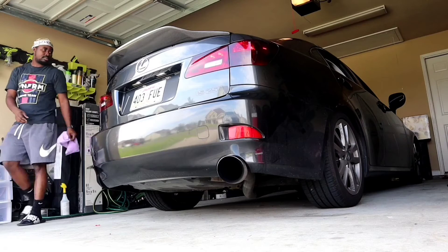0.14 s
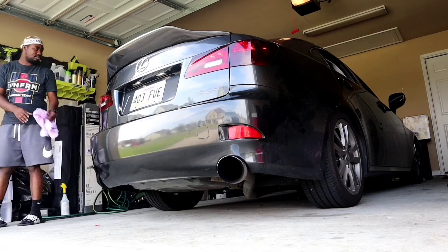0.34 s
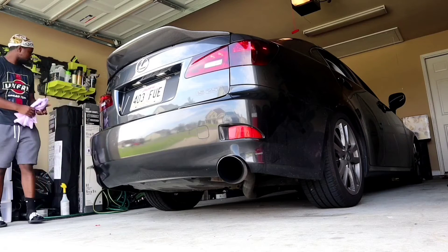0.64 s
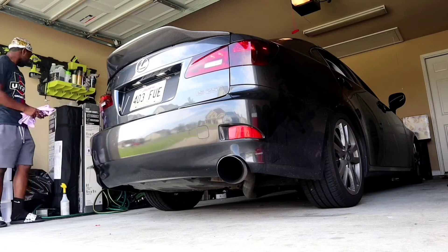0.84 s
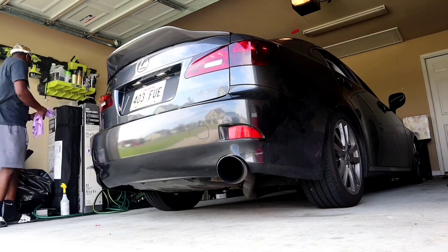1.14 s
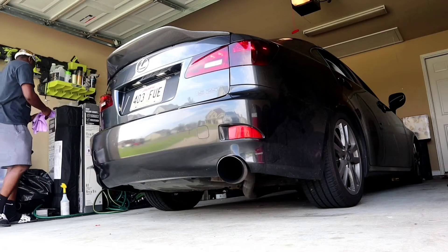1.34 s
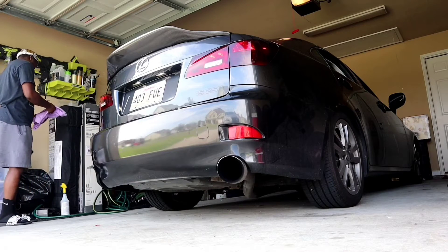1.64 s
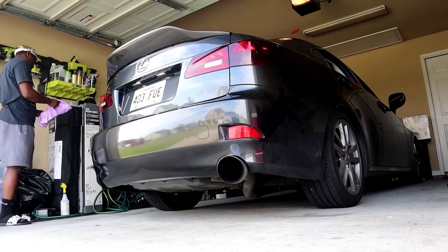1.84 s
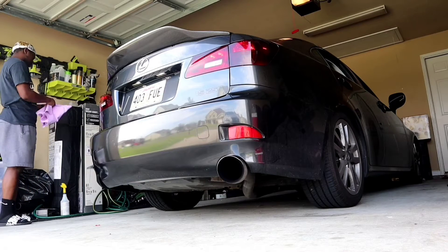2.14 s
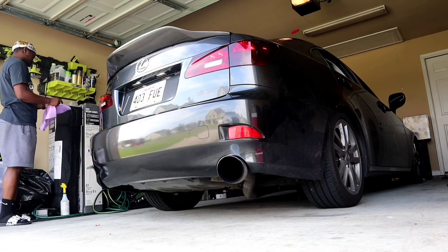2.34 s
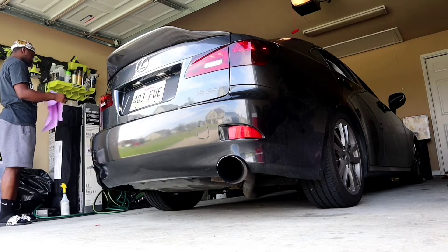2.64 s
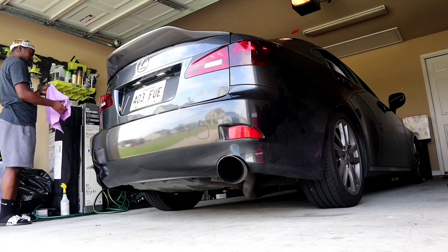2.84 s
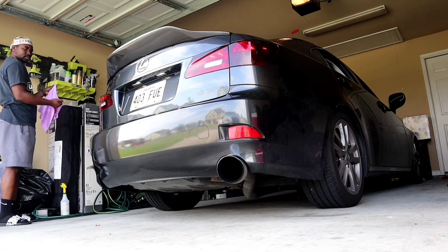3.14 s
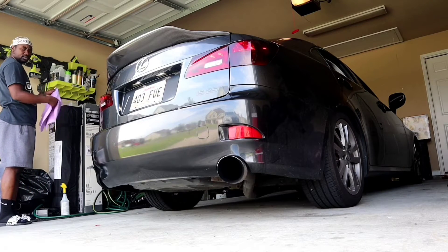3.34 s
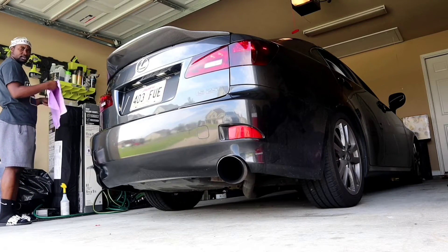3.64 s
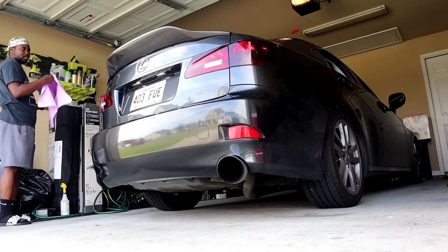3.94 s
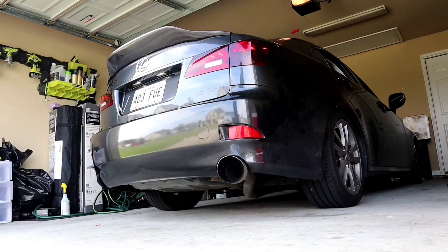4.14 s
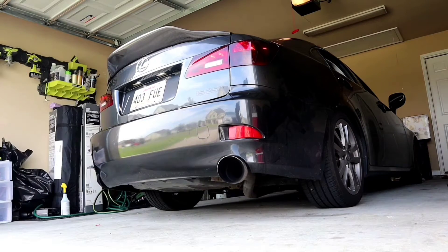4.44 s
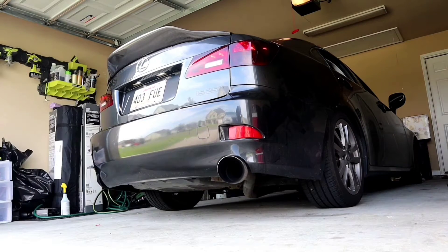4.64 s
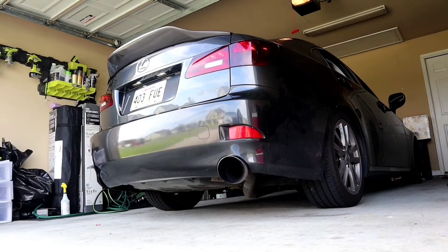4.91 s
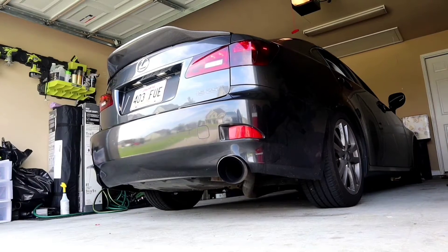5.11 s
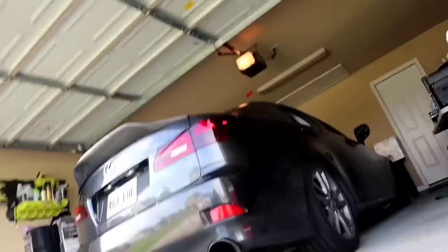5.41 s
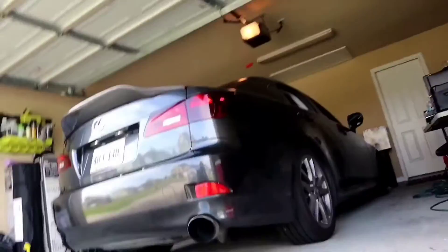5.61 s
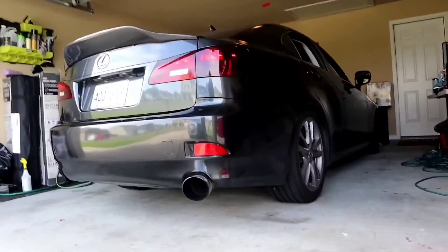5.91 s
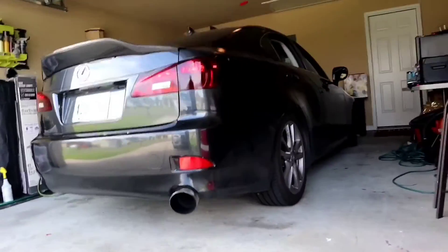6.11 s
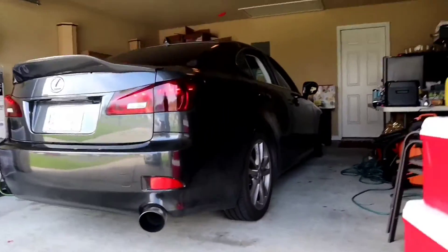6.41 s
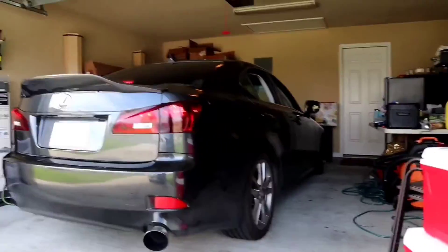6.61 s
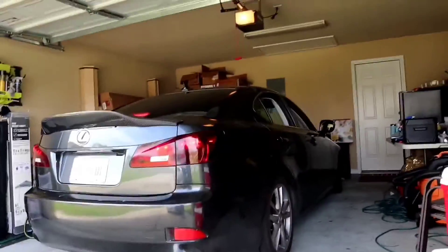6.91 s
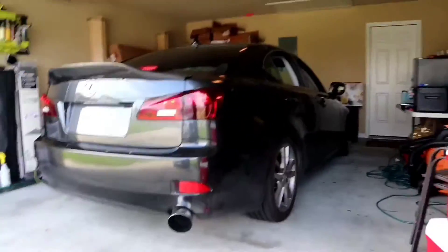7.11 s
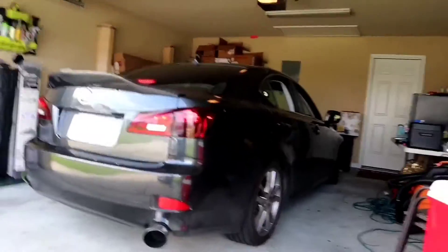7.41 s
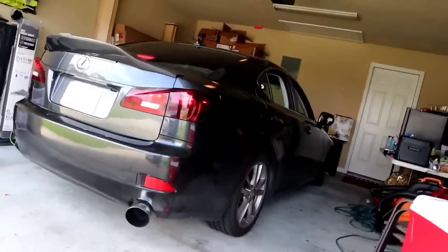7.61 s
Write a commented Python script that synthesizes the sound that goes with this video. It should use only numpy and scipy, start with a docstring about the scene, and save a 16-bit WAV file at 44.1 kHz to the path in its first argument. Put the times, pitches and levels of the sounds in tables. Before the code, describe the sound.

A six-cylinder car idles in a garage, heard close behind its open tailpipe. The low drone is lumpy and uneven, with quick booming surges, raspy gas and throbbing hiss over a faint belt whine. After about four seconds it cuts to a very short silence, then returns slightly slower and rounder with a few hard burbles, the sound turning a little hollow as the microphone is lifted off the floor.

```python
"""A six-cylinder car idles through an open exhaust in a garage, heard from just behind the tailpipe.
Even firings sum to a harmonic drone; uneven burns, and surges of hard ones, make pipe and garage boom.
Turbulent gas rasps and hisses, and the belt drive whines in proportion to engine speed.
The idle is lumpy at first; after a short silence it resumes a little slower and rounder, with a few hard
burbles, and the microphone is lifted off the floor, so that a floor reflection hollows the sound."""
import sys
import numpy as np
from scipy import signal
from scipy.fft import rfft, irfft
from scipy.io import wavfile
from scipy.ndimage import uniform_filter1d, minimum_filter1d

SR = 44100
rng = np.random.default_rng(int(sys.argv[2]) if len(sys.argv) > 2 else 0)


def store_pcm(level_fs):
    """Save levels as 16-bit WAV."""
    pcm = np.round(np.clip(level_fs, -1, 1) * 32767).astype(np.int16)
    wavfile.write(sys.argv[1], SR, np.atleast_2d(pcm).T)


N = 342216
TIME = np.arange(N) / SR  # s
FILTER_HZ = np.fft.rfftfreq(32768, 1 / SR)  # frequency grid of the resonant bodies


def gain_of(db):
    """Level law: decibels to amplitude."""
    return 10 ** (np.asarray(db) / 20)


def evened(x):
    """Power normalisation: scales to rms 1."""
    return x / np.sqrt(np.mean(x ** 2) + 1e-20)


def curve(rows, axis=1):
    """Linear interpolation: one column of a table of times, at every sample."""
    rows = np.array(rows)
    return np.interp(TIME, rows[:, 0], rows[:, axis])


def hump(peak_s, half_s):
    """Gaussian envelope: a bell of height 1 around its peak."""
    return np.exp(-np.minimum(((TIME - peak_s) / half_s) ** 2, 20))


def coloured_noise(points):
    """Spectral shaping: white noise given a spectrum, at rms 1."""
    hz, db = np.transpose(points)
    noise_hz = np.fft.rfftfreq(N, 1 / SR)
    colour_db = np.interp(np.log(noise_hz + 1), np.log(hz), db, left=-100, right=-100)
    spectrum = rfft(rng.standard_normal(N)) * gain_of(colour_db)
    return evened(irfft(spectrum, N))


def causal(magnitude):
    """Minimum phase: the complex response of a body that rings only after it is struck."""
    log_gain = np.log(np.maximum(magnitude / magnitude.max(), 1e-5))
    circle = np.concatenate([log_gain, log_gain[-2:0:-1]])
    # the Hilbert transform of the log magnitude gives the phase
    return np.exp(np.conj(signal.hilbert(circle)))[:len(magnitude)]


def ring(x, magnitude):
    """Convolution: a causal body answers the excitation x; rms 1."""
    impulse_response = irfft(causal(magnitude))
    return evened(signal.fftconvolve(x, impulse_response)[:N])


# resonances of pipe and garage: pitch_hz, width_hz, level_db (relative)
LUMPY_MODES = [(60.2, 1.53, -4.5), (97, 7.7, -3), (143.5, 8.6, 0), (177.5, 8.1, 2.5), (210.9, 12.1, -4),
               (246.2, 5.3, -1.5), (289.6, 13, -5.5), (337.4, 6.9, -7), (396.3, 5.5, -12), (443.6, 28, -21),
               (476, 21, -25), (549, 42, -22), (614.3, 13, -22.5), (672, 53, -29), (757, 45, -36),
               (830, 27, -33), (902, 22, -34), (963, 18, -33.5), (1050, 27, -34.5)]
ROUND_MODES = [(58.2, 1.2, 3), (102.1, 5.3, -0.5), (155.6, 21.7, -4.5), (183, 14.3, 1), (207, 24, -16.5),
               (251, 70, -9), (300, 9, -3.5), (341.8, 7.4, -6), (380, 13, -19), (439, 13, -20.5),
               (485.4, 17, -19), (595, 45, -21.5), (628.3, 10.7, -18.5), (712.5, 26.6, -21),
               (802, 100, -34.5), (930, 24, -35.5), (1023, 13, -32), (1093, 21, -35)]


def pipe_gain(modes):
    """Modal summation: the powers of steep-sided resonances add up to one magnitude."""
    power = np.zeros(len(FILTER_HZ))
    for pitch_hz, width_hz, level_db in modes:
        detuning = (FILTER_HZ - pitch_hz) / width_hz
        power += gain_of(level_db) ** 2 / (1 + detuning ** 2) ** 2
    return np.sqrt(power)


# each cylinder's habit, in firing order: surplus (share of a firing), jet (relative strength)
LUMPY_CYLINDERS = [(-0.11, 0.93), (0.024, 1.28), (-0.22, 0.96), (0.19, 1.27), (0.089, 0.66), (0.14, 0.89)]
ROUND_CYLINDERS = [(0.014, 1.57), (0.16, 0.85), (-0.23, 0.95), (0.0, 1.76), (-0.088, 1.44), (0.16, 1.1)]


def firings(cycles, cylinders, scatter):
    """Cyclic excitation: sample, surplus and jet of every firing, from the cylinder's habit and chance."""
    at = np.flatnonzero(np.diff(np.floor(cycles)) > 0)
    cylinder = np.round(cycles[at]).astype(int) % len(cylinders)
    habit, jet = np.array(cylinders)[cylinder].T
    chance = rng.uniform(-1, 1, len(at))
    return at, habit + scatter * chance, jet


# surges, short runs of hard burns: start_s, length_s, surplus (share of a firing)
SURGES = [(0.177, 0.034, 0.61), (0.39, 0.014, 0.69), (0.484, 0.018, 0.71), (0.605, 0.016, 0.26),
          (0.808, 0.073, 0.2), (1.155, 0.074, 0.12), (1.296, 0.042, 0.22), (1.47, 0.039, 0.66),
          (1.811, 0.03, .8), (1.919, 0.012, 1.4), (2, 0.025, 0.38), (2.135, 0.056, 0.58),
          (2.243, 0.026, 0.52), (2.319, .07, 0.73), (2.552, 0.054, 0.61), (2.76, 0.085, 0.39),
          (3.002, 0.039, 0.91), (3.194, 0.022, 0.83), (3.333, 0.057, .55), (3.446, 0.046, .45),
          (3.633, 0.092, 0.41), (3.883, 0.03, 0.97), (4.078, 0.0464, 0.57), (5.266, 0.015, 1.66),
          (5.398, 0.057, 0.81), (5.606, 0.019, 1.33), (5.813, 0.023, 0.81), (5.938, 0.0084, 1.75),
          (6.189, 0.016, 0.51), (6.814, .04, 0.62), (7.155, .025, 0.4), (7.616, 0.012, 0.61)]
# stumbles, a few weak burns in a row: peak_s, lack (share of a firing)
STUMBLES = [(0.54, 0.2), (1.02, 0.25), (1.41, 0.31), (2.73, 0.35), (2.94, 0.33), (3.28, 0.3), (3.598, 0.23),
            (5.339, 1), (5.7, 0.68), (6.0, 0.17)]
# a surge sags to a share of its first burn, then a few weak firings pay it back
SURGE_RISE_S, SURGE_SAG = 0.0088, 0.58
REBOUND, REBOUND_S = 0.68, 0.05


def burn_effort():
    """Slow modulation of the source: surges start hard, sag and rebound; stumbles are short hollows."""
    effort = np.zeros(N)
    for peak_s, lack in STUMBLES:
        effort -= lack * hump(peak_s, half_s=0.024)
    for start_s, length_s, surplus in SURGES:
        moments = start_s + np.array([-SURGE_RISE_S, 0, length_s,
                                      length_s + REBOUND_S / 2, length_s + REBOUND_S])
        effort += surplus * np.interp(TIME, moments, [0, 1, SURGE_SAG, -REBOUND, 0])
    return effort


def built_up(effort, build_s):
    """First-order lag: pressure in the pipe follows the burns with a time constant."""
    keep = np.exp(-1 / (build_s * SR))
    return signal.lfilter([1 - keep], [1, -keep], effort)


# slow drift in the strength of the exhaust: time_s, drone_db, rasp_db (both relative)
LOAD = [(0, -22.5, -37.5), (0.9, -24.5, -36), (2.2, -22.5, -34), (3.3, -24, -36.5), (4.3, -23.5, -34.5),
        (5, -21, -34), (5.7, -25, -34), (6.5, -24, -34.5), (7.75, -22, -31.5)]
# lines of the drone: multiple (of the firing rate), level_db (relative)
LUMPY_ORDERS = [(1, 3), (2, 2.5), (3, 7), (4, -36), (5, -1), (6, -19.5), (7, -16), (8, -12.5)]
ROUND_ORDERS = [(1, -16), (2, -1), (3, 1), (4, -8.5), (5, -15.5), (6, -19), (7, -47), (8, -26)]


def drone(cycles, orders, pipe, pressure, swell_db=4.5):
    """Harmonic series: even firings make clean lines, with the pipe's phase; upper ones swell with pressure."""
    pipe_phase = np.angle(causal(pipe))
    mean_rate_hz = (cycles[-1] - cycles[0]) / TIME[-1]
    swell = gain_of(swell_db * pressure)
    lines = np.zeros(N)
    for multiple, level_db in orders:
        lag = pipe_phase[np.searchsorted(FILTER_HZ, multiple * mean_rate_hz)]
        line = gain_of(level_db) * np.cos(2 * np.pi * multiple * cycles + lag)
        lines += line * swell if multiple > 2 else line
    return gain_of(curve(LOAD)) * lines


def burble(at, surplus, pipe, dull_hz=420):
    """Impulsive excitation: a firing's surplus or lack is a blunt push that leaves low resonances booming."""
    pushes = np.zeros(N)
    pushes[at] = surplus
    bluntness = 1 / np.sqrt(1 + (FILTER_HZ / dull_hz) ** 4)
    return ring(pushes, pipe * bluntness)


def gas_flow(at, surplus, jet, decay_s=0.0051, between=0.39, kick=0.093):
    """Pulsating flow: exhaust valves let out decaying jets, stronger after uneven burns, over a steady flow."""
    jets = np.zeros(N)
    jets[at] = jet * (1 + kick * abs(surplus))
    decaying = signal.lfilter([1], [1, -np.exp(-1 / (decay_s * SR))], jets)
    return evened(between + decaying)


def rasp(flow, pipe, thin_hz=480):
    """Flow-modulated turbulence: noise in the jets excites the higher resonances."""
    puffs = flow * rng.standard_normal(N)
    thinness = FILTER_HZ / np.hypot(FILTER_HZ, thin_hz)
    return gain_of(curve(LOAD, axis=2)) * ring(puffs, pipe * thinness)


# colour of the hiss, common to both sides and opposed between them: pitch_hz, level_db (relative, per Hz)
HISS_MID = [(590, -20), (1000, -6.5), (1200, -3), (1420, -4), (2010, -9), (2240, -8), (3590, -11.5),
            (3910, -11), (6130, -18), (9220, -21), (11900, -18.5), (13000, -19.5)]
HISS_SIDE = [(350, 0), (600, 1), (766, -6.5), (1140, -3.5), (1440, -6), (2040, -3), (2230, -7.5),
             (2410, -4), (4580, -7.5), (5930, -9.5), (9070, -13), (11900, -9), (13000, -11)]
# rushing air in each stretch: time_s, level_db (before swells, colour and throb)
LUMPY_HISS = [(0, -43), (0.9, -42), (4.2, -42)]
ROUND_HISS = [(4.259, -46), (4.9, -41.5), (5.65, -46), (6.65, -44), (7.3, -47), (7.75, -40.5)]
# brief swells of the hiss: peak_s, half_length_s, rise_db
HISS_SWELLS = [(0.612, 0.055, 2), (1.82, 0.024, 6), (2.306, 0.25, 3.0), (3.481, 0.024, 4.5),
               (3.903, .05, 3.5), (4.683, 0.057, 6), (5.888, 0.051, 5)]
# the microphone is picked up from the floor: time_s, height (share of full height)
LIFT = [(0, 0), (5.4, 0.041), (6.0, 0.28), (6.55, 0.89), (7.2, 0.56), (7.75, 0.63)]
LIFT_HISS_DB = 1.5  # rise of the lower hiss at full height


def hiss(flow, level, throb=0.61, throb_below_hz=2600, mid_db=-0.44, side_db=0.5):
    """Broadband jet noise: a wide rush whose lower part throbs with the flow."""
    mid = gain_of(mid_db) * coloured_noise(HISS_MID)
    side = gain_of(side_db) * coloured_noise(HISS_SIDE)
    air = np.array([mid + side, mid - side])
    low_pass = signal.butter(2, throb_below_hz, fs=SR, output="sos")
    low = signal.sosfiltfilt(low_pass, air)
    # the lower part comes more from the right
    lean = gain_of(np.array([[-2.2], [0.5]]) + LIFT_HISS_DB * curve(LIFT))
    throbbing = lean * low * (1 + throb * (flow - 1))
    level_db = curve(level)
    for peak_s, half_s, rise_db in HISS_SWELLS:
        level_db = level_db + rise_db * hump(peak_s, half_s)
    return gain_of(level_db) * (air - low + throbbing)


# belt-driven parts: multiple (of the firing rate), blur_hz (each way), floor_db, full_height_db
WHINES = [(26.5, 23, -55, -50.5), (34.2, 84, -60, -49.5), (41.7, 6.4, -55.5, -60), (80, 69, -86, -76)]


def whine(cycles):
    """Narrow-band noise on engine orders: thin tones, blurred by the room differently on each side."""
    out, lift = np.zeros((2, N)), curve(LIFT)
    for multiple, blur_hz, floor_db, full_height_db in WHINES:
        noise = rng.standard_normal((2, N)) + 1j * rng.standard_normal((2, N))
        blur = signal.sosfilt(signal.butter(2, blur_hz, fs=SR, output="sos"), noise)
        tone = (blur * np.exp(2j * np.pi * multiple * cycles)).real
        level_db = floor_db + (full_height_db - floor_db) * lift
        out += gain_of(level_db) * evened(tone)
    return out


def garage(x, echo_s=0.0085, direct=0.957, bounce_s=0.0013, bounce=0.31):
    """All-pass echoes and comb filtering: walls smear firings; a rising microphone hollows the low middle."""
    echo = np.exp(-2j * np.pi * np.fft.rfftfreq(N, 1 / SR) * echo_s)
    smeared = irfft(rfft(x) * (direct + echo) / (1 + direct * echo), N)
    # bounce_s is the lag of the floor reflection at full height
    reflection = np.interp(TIME - bounce_s * curve(LIFT), TIME, smeared)
    return (smeared + bounce * reflection) / (1 + bounce)


def from_the_right(x, lag_s=8.5e-5, mono_below_hz=150):
    """Interaural delay: the exhaust reaches the left side slightly later; the bass is alike on both."""
    apart = np.interp(TIME - lag_s, TIME, x) - x
    high_pass = signal.butter(1, mono_below_hz, "high", fs=SR, output="sos")
    left = x + signal.sosfiltfilt(high_pass, apart)
    return np.array([left, x])


BURBLE_SWELL_DB = 11  # rise of the burble under a full surplus


def idle(span, first_firing_s, speed, orders, modes, cylinders, air, scatter,
         drone_db, burble_db, boom_db, rasp_db, rasp_swell_db):
    """Common excitation: every layer of a stretch of idling follows the same firing cycle and burns."""
    cycles = np.cumsum(curve(speed)) / SR  # one per firing
    cycles -= np.interp(first_firing_s, TIME, cycles)
    at, surplus, jet = firings(cycles, cylinders, scatter)
    effort, pipe = burn_effort(), pipe_gain(modes)
    flow = gas_flow(at, surplus + effort[at], jet)
    pressure = built_up(effort, build_s=0.0059)
    rasp_pressure = built_up(effort, build_s=0.013)

    exhaust = gain_of(drone_db) * drone(cycles, orders, pipe, pressure)
    exhaust += gain_of(burble_db + BURBLE_SWELL_DB * pressure) * burble(at, surplus, pipe)
    exhaust += gain_of(boom_db) * burble(at, effort[at], pipe, dull_hz=344)
    exhaust += gain_of(rasp_db + rasp_swell_db * rasp_pressure) * rasp(flow, pipe)

    start_s, end_s = span
    heard = np.clip(np.minimum(TIME - start_s, end_s - TIME) / 0.001, 0, 1)  # 1 ms fades
    return heard * (from_the_right(garage(exhaust)) + hiss(flow, air) + whine(cycles))


# engine speed in each stretch: time_s, rate_hz (firings per second)
LUMPY_SPEED = [(0.0, 55.13), (0.6, 55.28), (1.2, 54.84), (1.8, 54.94), (2.39, 55.16), (2.99, 54.77),
               (3.59, 55.02), (4.19, 55.11)]
ROUND_SPEED = [(4.26, 53.98), (4.76, 52.93), (5.26, 53.41), (5.76, 54.41), (6.26, 53.67), (6.75, 53.83),
               (7.25, 53.48), (7.75, 53.19)]
# start and end of each stretch of idling (s)
LUMPY_SPAN, ROUND_SPAN = (0, 4.197), (4.261, 7.76)
# moment at which the first cylinder fires in each stretch (s)
LUMPY_START_S, ROUND_START_S = 0.0055, 4.2705


def scene():
    """Superposition: the lumpy idle, a short silence, the rounder idle."""
    lumpy = idle(LUMPY_SPAN, LUMPY_START_S, LUMPY_SPEED, LUMPY_ORDERS, LUMPY_MODES, LUMPY_CYLINDERS,
                 LUMPY_HISS, scatter=0.4, drone_db=-1.2, burble_db=-26.5, boom_db=-24.0,
                 rasp_db=13.5, rasp_swell_db=3.5)
    rounder = idle(ROUND_SPAN, ROUND_START_S, ROUND_SPEED, ROUND_ORDERS, ROUND_MODES, ROUND_CYLINDERS,
                   ROUND_HISS, scatter=0.21, drone_db=5.5, burble_db=-30, boom_db=-31,
                   rasp_db=9.5, rasp_swell_db=0.5)
    return lumpy + rounder


def record(dry, ceiling=0.72, edge_hz=13300):
    """Peak limiting and band limiting: a quick limiter holds down the loudest peaks before a low-pass."""
    allowed = np.minimum(1, ceiling / (abs(dry).max(axis=0) + 1e-9))
    gain = uniform_filter1d(minimum_filter1d(allowed, size=301), size=301)
    low_pass = signal.firwin(401, edge_hz, window=("kaiser", 9), fs=SR)
    return signal.oaconvolve(dry * gain, low_pass[None], "same")


dry = scene()
out = record(dry)
store_pcm(out)
```